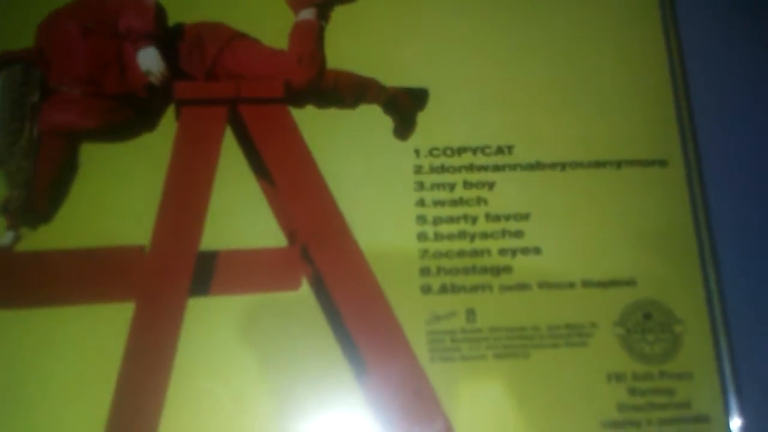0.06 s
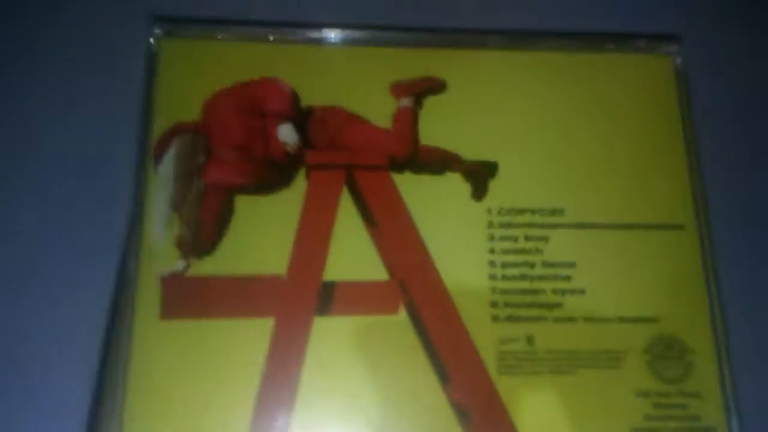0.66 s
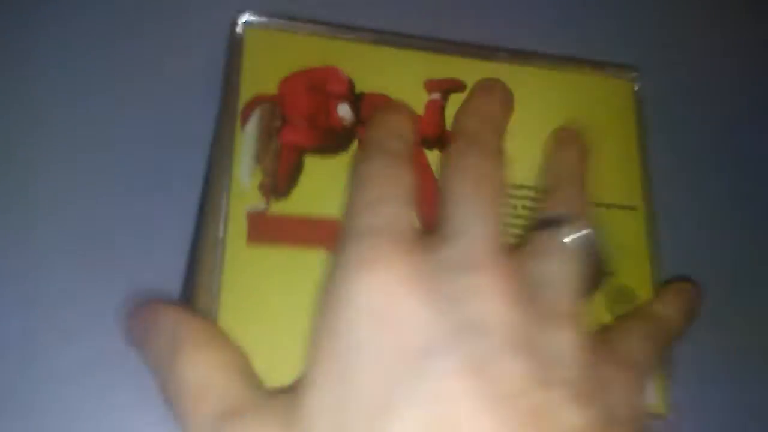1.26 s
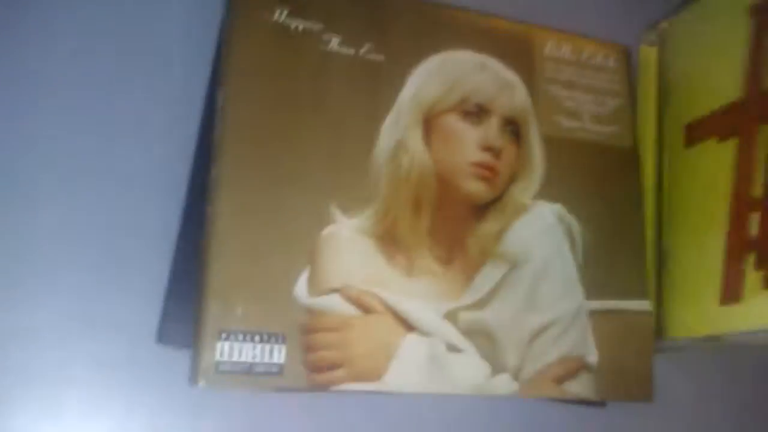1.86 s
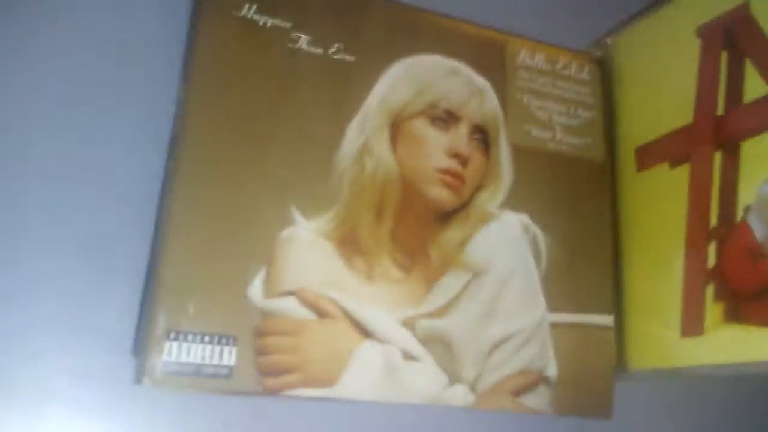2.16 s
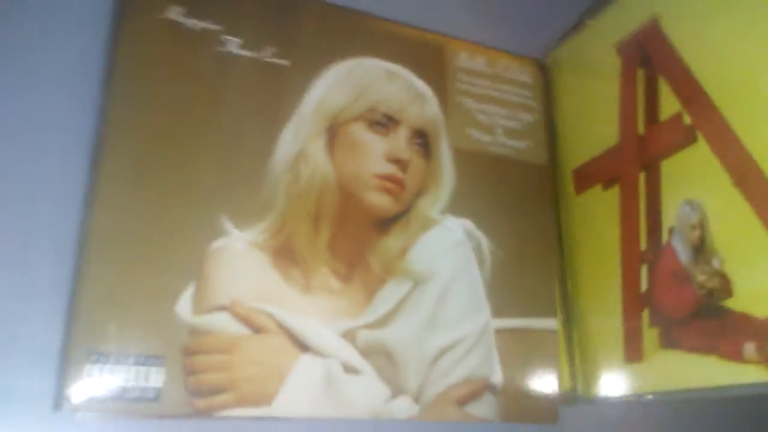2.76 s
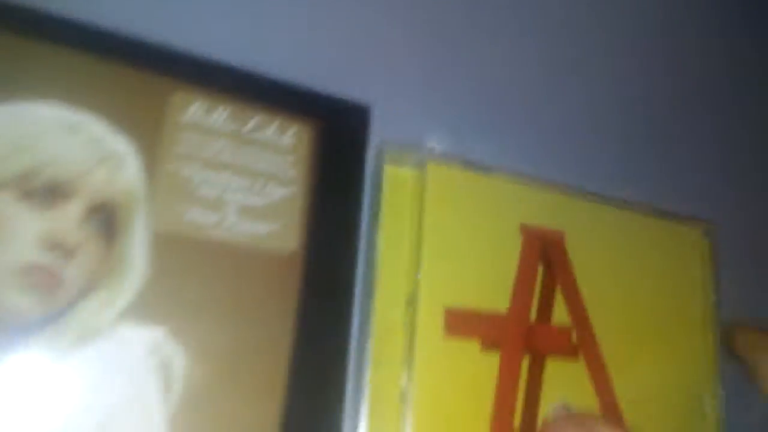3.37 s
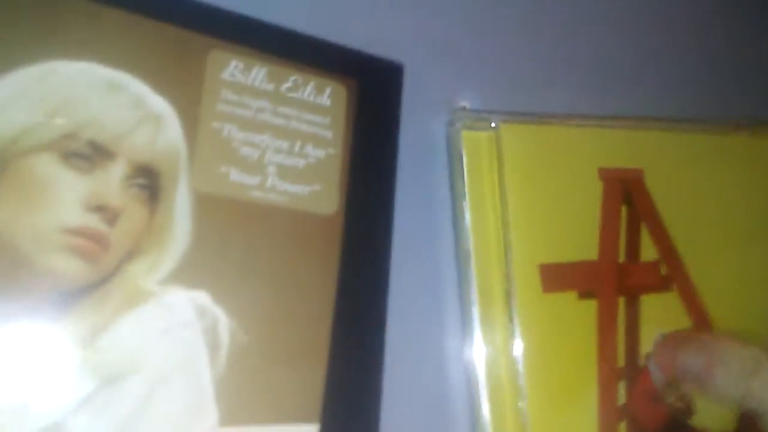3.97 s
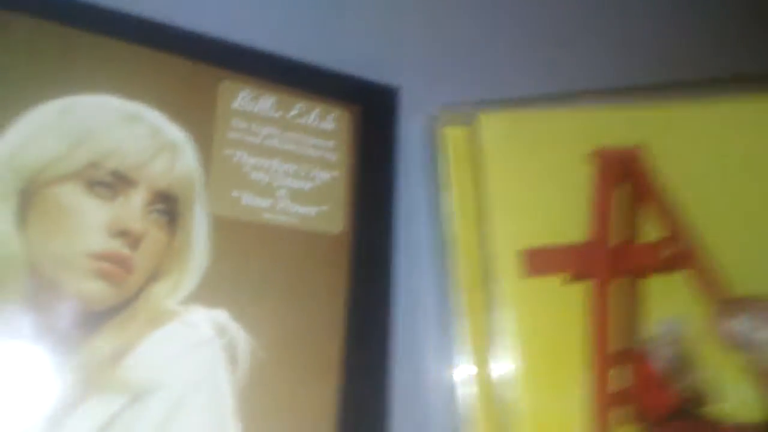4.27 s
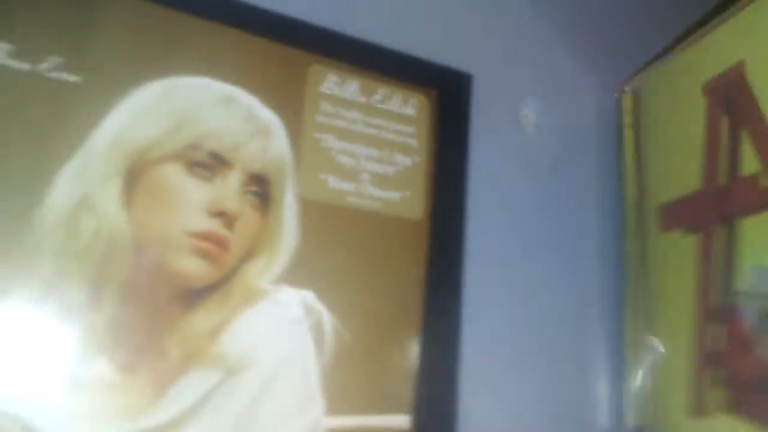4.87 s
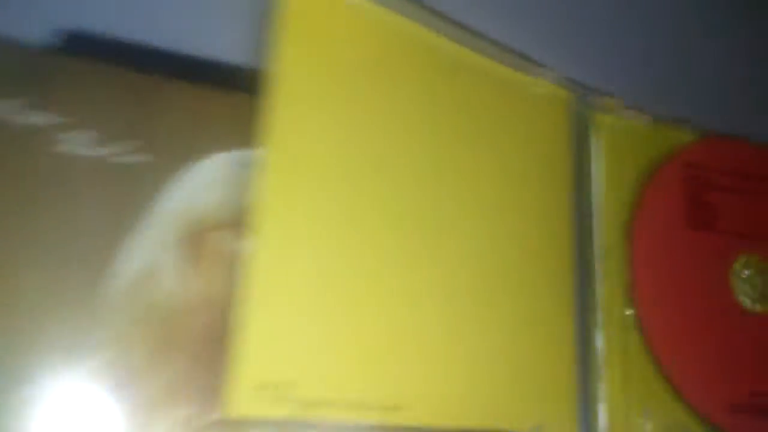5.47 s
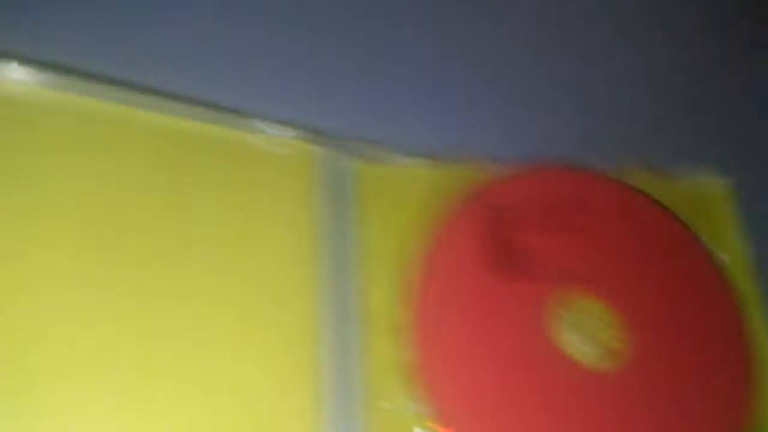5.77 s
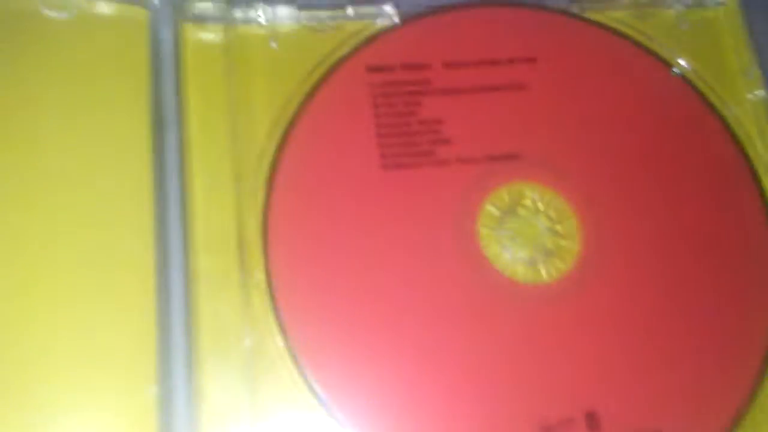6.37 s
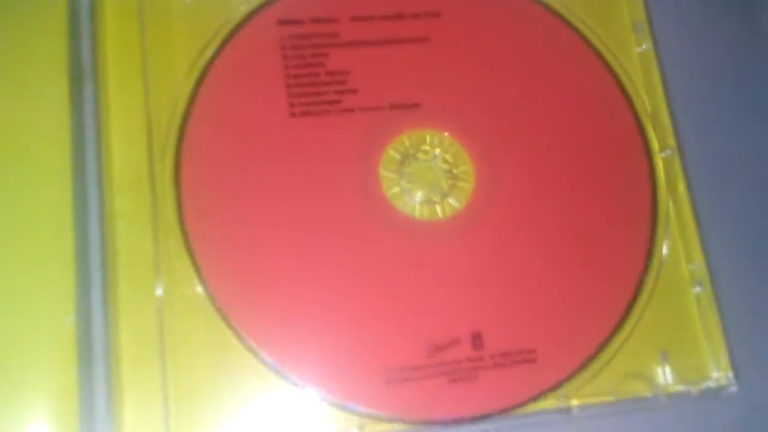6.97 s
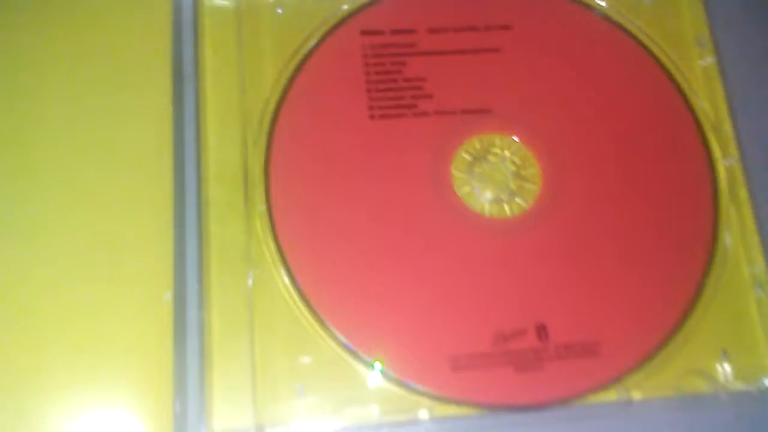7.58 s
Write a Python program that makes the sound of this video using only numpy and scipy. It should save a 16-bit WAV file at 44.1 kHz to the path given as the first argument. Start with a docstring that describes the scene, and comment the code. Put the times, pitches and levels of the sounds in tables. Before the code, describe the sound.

Hands rub softly on a plastic disc case and slide it over a card sleeve with a few light clicks. A loud, sharp clatter follows with a thump on the table, then a second burst, a faint squeak and a thinner clatter as the case opens. A few soft bumps fade into quiet rubbing. It is all close, in a small room with faint hiss and hum, on a slightly dull microphone.

```python
"""A table in a small room: a plastic disc case is slid over a card sleeve, shifted about and opened.
Its loose lid, tray and hinge click and clatter, each hit a low knock, a mid clack and a bright snap
with a short ring from the thin shell. The table thumps, the plastic squeaks and hands rub softly.
Under it lies steady room tone with a faint hum, all heard close on a small camera's dull microphone."""
import sys
import numpy as np
from scipy import signal
from scipy.fft import rfft, irfft, next_fast_len
from scipy.io import wavfile
from scipy.ndimage import uniform_filter1d, minimum_filter1d, map_coordinates

SR = 44100
rng = np.random.default_rng(int(sys.argv[2]) if len(sys.argv) > 2 else 0)


def put_to_file(sound):
    """Save the sound as 16-bit audio at rate SR, in the file named by the first command-line argument."""
    columns = np.atleast_2d(sound).T  # one column per channel
    safe = np.clip(columns, -1, 1)
    whole_steps = np.round(safe * 32767)
    wavfile.write(sys.argv[1], SR, whole_steps.astype(np.int16))


N = 341183

# lid, tray and case hit each other or the table; harder is snappier: t/s, level/dB, hardness/dB, t60/s
CLICK_CUES = [(0.362, -59, 15, .022), (.397, -51.5, 15.5, 0.0059), (1.713, -27, -3, 0.022),
              (1.733, -34, -5.5, 0.058), (1.9, -31, -16.5, 0.044), (1.910, -40.5, -27, 0.05),
              (2.134, -21.5, 1, .026), (2.96, -13.5, 1, 0.014), (3.019, -34, 4.5, .038),
              (3.154, -29, -2, 0.079), (3.163, -20.5, 5, .048), (3.222, -44.5, 9.5, 0.045),
              (3.275, -6.5, 0, 0.049), (3.281, -13.5, 7.5, .036), (3.302, -23.5, 9, 0.049),
              (3.377, -30.5, 4, 0.043), (3.385, -25.5, 5, 0.024), (3.401, -36, 2, 0.023),
              (3.413, -27, -23, 0.051), (3.42, -27, 6, 0.056), (3.449, -23.5, 1, 0.034),
              (4.058, -43.5, -17, 0.062), (4.107, -32, -7.5, 0.047), (4.173, -36.5, -11, 0.057),
              (4.19, -36.5, 4.5, 0.051), (4.3171, -12.5, 1, 0.04), (4.323, -16.5, 1.5, .032),
              (4.344, -26.5, 0.5, 0.03), (4.359, -28.5, 3, 0.051), (4.458, -41, 0.5, 0.068),
              (4.6385, -40.5, -5.5, 0.036), (4.658, -34, -12.5, 0.043), (4.918, -41.5, -1, .036),
              (4.9407, -28.5, 6, 0.063), (4.955, -30.5, -7, 0.048), (4.98, -34, -7, 0.059),
              (5.287, -23.5, 3.5, 0.02), (5.302, -31, 3.5, 0.032), (5.327, -36, 10.5, 0.037),
              (5.34, -30.5, 9, 0.054), (5.349, -26.5, 3, 0.043), (5.402, -28.5, 5.5, 0.083),
              (5.442, -29, 2, 0.047)]
# an edge or a finger scrapes along, then catches: t/s, level/dB, hardness/dB, swell/s
SCRAPE_CUES = [(1.325, -45, -6.5, 0.0048), (1.612, -44.5, -2, 0.022), (3.073, -26.5, 4, 0.0093),
               (3.341, -19, 5, 0.0042), (4.086, -30, -4.5, 0.012), (4.256, -24.5, -3.5, 0.0065),
               (4.286, -21, 2.5, .0034), (4.573, -51, -12, .008), (4.801, -45, 7.5, 0.0067),
               (5.367, -18.5, 5.5, 0.0044), (5.83, -44, -17, 0.009), (5.866, -48, -1.5, 0.0062),
               (5.924, -48, -11, .006)]
# EQ of a hit's three layers, body knock, panel clack and edge snap: f/Hz, level/dB
KNOCK_EQ = [(25, -55.5), (60, -20), (130, -13.5), (200, -5.5), (340, 0), (560, 0.5), (750, -11),
            (1200, -38)]
CLACK_EQ = [(350, -38.5), (700, -9.5), (1000, 0), (1500, 1), (2050, -1.5), (2400, -6.5), (2900, -3),
            (3900, -24)]
SNAP_EQ = [(1900, -30), (2900, -6.5), (3500, 1), (4500, -0.5), (5900, 3), (9000, -2), (11000, -2),
           (15000, -2)]
# ringing modes of the thin shell: f/Hz, level/dB, t60/s
SHELL_MODES = [(356.2, -10, .12), (978, -13.5, .17), (1498, -6.5, .1), (1585, -18.5, .13),
               (1920, -9.5, .07), (2546, -7, .15), (3176, -4.5, .14), (3509, -9, .1), (3718, -10, .07),
               (4211, -8, .15), (4716, -7, .12), (5046, -2.5, .058), (5502, -13.5, .1), (5956, -9.5, .15)]
# hand and case bump the table: t/s, f/Hz, level/dB, t60/s
THUMP_CUES = [(1.901, 100, -47, 0.15), (3.277, 42, -40, .2), (3.282, 96, -32, 0.22),
              (3.277, 249.5, -8.5, 0.069), (4.318, 205.5, -22.5, .1), (5.303, 96, -41, 0.16),
              (5.37, 215, -30, 0.089), (5.655, 197, -35.5, 0.12), (5.839, 224, -34, 0.15),
              (5.932, 205, -37.5, 0.13)]
# plastic sticks and slips: t/s, length/s, f/Hz, pitch jitter/Hz, level/dB
SQUEAK_CUES = [(0.3955, 0.0034, 3600, 250, -39), (2.906, .024, 3270, 90.2, -43.5),
               (4.626, 0.078, 2546, 130, -49), (4.694, 0.28, 2520, 121, -60.5)]
# the case slides over card and table: t/s, length/s, level/dB
SLIDE_CUES = [(1.435, 0.58, -50.5), (2.139, 0.18, -47.5), (2.959, 0.63, -44.5), (4.11, .3, -47),
              (4.679, .4, -49.5), (5.328, 0.29, -50.5)]
# pressure of the rubbing hands, as a fader ride: t/s, level/dB
HAND_PRESSURE = [(0.0, -50), (0.21, -47.5), (0.97, -49.5), (1.75, -47.5), (2.45, -54), (2.95, -50.5),
                 (3.3, -44), (3.49, -51), (3.81, -53.5), (4.07, -52.5), (4.26, -47.5), (4.68, -50),
                 (5.24, -53), (5.51, -49.5), (6.1, -56.5), (7.41, -56), (7.74, -54.5)]
# EQ of the rub's soft body and of its friction hiss: f/Hz, level/dB
RUB_BODY_EQ = [(80, -25), (230, -2), (480, 1.5), (680, -2), (900, -0.5), (1150, -5.5), (1500, -9.5),
               (1950, -11.5), (2600, -13.5), (3500, -23.5)]
RUB_HISS_EQ = [(700, -12), (1900, 5), (3000, -1), (3600, 0.5), (4500, 0), (5600, 3.5), (9000, -9.5)]
# reverb time of the room: f/Hz, t60/s
ROOM_DECAY = [(100, .6), (400, 0.54), (1500, 0.29), (4000, 0.32), (8000, 0.21)]
# EQ of room air and microphone hiss: f/Hz, level/dB
AIR_EQ = [(25, -42.5), (65, -24), (110, -23.5), (190, -9), (340, 4), (450, 0), (750, -1), (1200, -9),
          (2000, -11.5), (4000, -17), (5600, -14.5), (9000, -22)]
# partials of the hum: f/Hz, level/dB
HUM_PARTIALS = [(75.4, -82.5), (145.3, -68.5), (242.2, -68), (360.7, -70), (516.8, -65.5)]
# response of the narrow-band microphone: f/Hz, level/dB
MIC_EQ = [(5900, 1), (6450, -4), (7000, -11), (7650, -30.5), (9300, -28), (10200, -47), (15500, -68)]

CLICK_RISE_S, SCRAPE_T60_S = .0014, .046
HEAVY_T60_S = 0.052  # a hit this long moves the whole case; a quicker one only the lid
LID_OPEN_S = 5.2  # from here on the open case clacks thinner and higher


def case(lead_s=.0008):
    """Clicks, scrapes and ticks of the plastic case, each with its own room reverb."""
    hits = [(s, rebounding(s, db, hard, CLICK_RISE_S, t60)) for s, db, hard, t60 in CLICK_CUES]
    hits += [(s, rebounding(s, db, hard, swell, SCRAPE_T60_S)) for s, db, hard, swell in SCRAPE_CUES]
    out = np.zeros(N)
    for s, sound in hits + list(ticks()):
        add(out, s - lead_s, sound)
        add(out, s - lead_s, room(sound))
    return out


def contact(s, db, hardness_db, rise, t60, graze_s=.0008, shift_octaves=.33, open_octaves=0.23):
    """One hit: a low knock of the whole case, a clack of its panels and a snap of its edges."""
    t = np.arange(SR // 4) / SR
    # the parts graze just before they meet, rattle for a few milliseconds, then settle quickly
    attack = rise + graze_s
    fade_db = 20 * (3 * np.maximum(t - attack, 0) / t60) ** 1.116
    envelope = np.minimum(t / attack, 1) ** 2 * amp(-fade_db)
    knock_db = -2 - 24.5 * lightness(t60) - 0.18 * hardness_db  # heavy, soft hits knock most
    blow = amp(knock_db) * clatter(envelope, KNOCK_EQ, chatter_db=0.1)
    stiffness = np.tanh((hardness_db + 1.5) / 7)  # harder hits shake stiffer, higher parts of the panels
    pitch = 2 ** (shift_octaves * stiffness + open_octaves * (s > LID_OPEN_S))
    clack_eq = [(hz * pitch, level) for hz, level in CLACK_EQ]
    blow += amp(-0.5) * clatter(envelope, clack_eq, chatter_db=3.7)
    blow += amp(hardness_db + 3) * clatter(envelope, SNAP_EQ, chatter_db=1.0)
    return amp(db) * (blow + shell(blow, t))


def rebounding(s, db, hardness_db, rise, t60, bounce_loss_db=13.5, light_loss_db=16):
    """A hit and two ever weaker bounces as the loose parts fall back; light hits hardly bounce."""
    sound = contact(s, db, hardness_db, rise, t60)
    flights_s = 0.38 * t60 * np.exp(.25 * rng.standard_normal(2))
    db = db - light_loss_db * lightness(t60)
    for k, delay in enumerate(np.cumsum(flights_s), 1):
        bounce = contact(s, db - k * bounce_loss_db, hardness_db, CLICK_RISE_S, t60=0.045)
        add(sound, rise + delay, bounce)
    return sound


def lightness(t60):
    """0 for a hit that moves the whole case, nearing 1 for the quickest flick of the lid."""
    return max(1 - t60 / HEAVY_T60_S, 0)


def clatter(envelope, eq, chatter_db):
    """Loose parts chatter and shake panel modes so dense that they blur into a noise burst."""
    slips = unit(uniform_filter1d(rng.standard_normal(len(envelope)), size=30))
    burst = coloured(envelope * amp(chatter_db * slips) * rng.standard_normal(len(envelope)), eq)
    return burst * np.linalg.norm(envelope) / np.linalg.norm(burst)


def shell(blow, t, ring_db=-52.5, scatter_db=2.0):
    """The thin shell rings on after a blow, its modes balanced anew for each spot that is struck."""
    hz, db, t60 = np.transpose(SHELL_MODES)[:, :, None]
    struck_db = db + scatter_db * rng.standard_normal(hz.shape)
    modes = amp(struck_db - 60 * t / t60) * np.cos(2 * np.pi * hz * t)
    return amp(ring_db) * signal.fftconvolve(blow, modes.sum(axis=0))[:len(t)]


def ticks(per_slide=3, trim_db=-2.5, spread_db=0.5):
    """The sliding case catches lightly at random moments; yields (time, sound) pairs."""
    for start, length, db in SLIDE_CUES:
        for when, softness in zip(rng.random(per_slide), rng.standard_normal(per_slide)):
            tick_db = db + trim_db - spread_db * softness
            yield start + when * length, contact(start, tick_db, 0, CLICK_RISE_S, t60=0.026)


def thumps(attack_s=0.0052, mode_spread=.15):
    """Soft, heavy bumps rock the table top in three close, quickly damped low modes."""
    out, t = np.zeros(N), np.arange(SR // 3) / SR
    for s, hz, db, t60 in THUMP_CUES:
        detune = np.exp(mode_spread * (np.arange(-1, 2) + .3 * rng.standard_normal(3)))
        ring = np.sin(2 * np.pi * hz * detune[:, None] * t).mean(axis=0)
        add(out, s, ring * amp(db - 60 * t / t60) * (1 - np.exp(-t / attack_s)))
    return out + room(out)


def squeaks(flutter_db=5.5):
    """Stick-slip keeps one narrow resonance of the plastic singing for a moment."""
    out = np.zeros(N)
    for s, length, hz, jitter_hz, db in SQUEAK_CUES:
        size = int(length * SR)
        pitch = hz + jitter_hz * wobble(460)[:size]
        tone = np.sin(2 * np.pi * np.cumsum(pitch) / SR) * amp(flutter_db * wobble(400)[:size])
        add(out, s, amp(db) * unit(tone) * signal.windows.tukey(size, .5))
    return out + room(out)


def rubbing(rise_s=0.016, fall_s=.18, grain_db=2.7, uneven_db=1.9):
    """Skin, card and plastic slide with uneven pressure: a soft body under a grainy hiss."""
    t = np.arange(N) / SR
    hands_db = np.interp(t, *np.transpose(HAND_PRESSURE))
    effort_db = hands_db - hands_db.mean()
    sliding = np.zeros(N)
    for s, length, db in SLIDE_CUES:
        fade_in = np.interp(t - s, [0, rise_s], [0, 1])
        fade_out = np.interp(t - s - length, [-fall_s / 2, fall_s / 2], [1, 0])
        sliding += amp(db) * fade_in * fade_out
    body = amp(hands_db.mean() + 1.21 * effort_db - 3) * noise(RUB_BODY_EQ, patchy_db=2)
    skin = amp(-65.5 + 1.7 * effort_db)  # pressing harder lifts the hiss faster than the body
    hiss = np.hypot(sliding, skin) * amp(grain_db * wobble(260) - 5) * noise(RUB_HISS_EQ, patchy_db=3)
    return amp(uneven_db * wobble(14)) * (body + hiss)


def room(x, wet_db=-17, early_t60=0.058, predelay_s=.006):
    """Early reflections off table and walls, then a diffuse tail; new on each call, as the case moves."""
    hz, t, spectra = signal.stft(rng.standard_normal(SR * 3 // 4), SR, nperseg=256)
    decay = amp(-60 * t / along(ROOM_DECAY, hz)[:, None])
    tail = signal.istft(spectra * decay, SR, nperseg=256)[1]
    t = np.arange(len(tail)) / SR
    early = rng.standard_normal(len(t)) ** 3 * amp(-60 * t / early_t60)  # cubed for sparse spikes
    impulse = amp(wet_db) * (tail / np.linalg.norm(tail) + early / np.linalg.norm(early))
    return signal.fftconvolve(x, np.pad(impulse, (round(predelay_s * SR), 0)))[:N]


def table_reflection(x, height_m=0.16, sway_db=1.6, sway_per_s=1.5, reflection=0.12):
    """A reflection off the table puts a faint, slowly drifting hollow colour on rubbing and room tone."""
    height = height_m * amp(sway_db * wobble(sway_per_s))  # the hand-held camera sways
    delay = 2 * height / 343 * SR
    return x + reflection * map_coordinates(x, [np.arange(N) - delay])


def room_tone(air_db=-55, hum_trim_db=-1, drift_rad=0.56):
    """A steady bed of room air with a faint, slightly wavering hum."""
    t = np.arange(N) / SR
    hum = np.zeros(N)
    for hz, db in HUM_PARTIALS:
        phase = 2 * np.pi * hz * t + drift_rad * wobble(2.7)
        hum += amp(db + hum_trim_db) * np.sqrt(2) * np.sin(phase)
    return amp(air_db + .5 * wobble(1.5)) * noise(AIR_EQ, patchy_db=1.5) + hum


def noise(eq, patchy_db):
    """Noise of rms 1 whose colour drifts around the EQ curve in broad patches."""
    spectra = signal.stft(rng.standard_normal(N), nperseg=1024)[2]
    patches = uniform_filter1d(rng.standard_normal(spectra.shape), size=5, axis=0)
    patches = uniform_filter1d(patches, size=18, axis=1)
    patchy = signal.istft(spectra * amp(patchy_db * unit(patches)), nperseg=1024)[1][:N]
    return unit(coloured(patchy, eq))


def coloured(x, eq, rolloff_db_per_octave=24):
    """Minimum-phase EQ through (f/Hz, level/dB) points, with a roll-off above the last."""
    size = next_fast_len(len(x) + 4096, True)
    hz = np.fft.rfftfreq(size, 1 / SR)
    db = along(eq, hz) - rolloff_db_per_octave * np.log2(np.maximum(hz / eq[-1][0], 1))
    cepstrum = irfft(np.log(amp(db)), size)
    cepstrum[1:size // 2] *= 2  # folded forward, so nothing rings ahead of a transient
    cepstrum[size // 2 + 1:] = 0
    return irfft(rfft(x, size) * np.exp(rfft(cepstrum)), size)[:len(x)]


def along(points, hz):
    """Read (f/Hz, value) points on a log frequency axis."""
    f, values = np.transpose(points)
    return np.interp(np.log(hz + 1), np.log(f), values)


def wobble(rate):
    """A smooth random modulator, rate knots a second."""
    return map_coordinates(rng.standard_normal(int(N * rate / SR) + 4), [np.arange(N) * rate / SR])


def amp(db):
    """Decibels to gain."""
    return 10 ** (np.asarray(db) / 20)


def unit(x):
    """Scale to rms 1."""
    return x / np.sqrt(np.mean(x ** 2) + 1e-20)


def add(track, s, x):
    """Mix x into the track from time s."""
    i = max(round(s * SR), 0)
    track[i:i + len(x)] += x[:len(track) - i]


def scene():
    """The mono mix: hits, thumps and squeaks over the rubbing and the room tone."""
    return (case() + thumps() + squeaks() + table_reflection(rubbing() + room_tone()))[None]


def record(dry, self_noise_db=-89, limit=0.91, clip_at=.89, top_hz=15800):
    """The microphone dulls the top end; the hardest clack is limited and its tips clip with a crack."""
    x = coloured(dry[0], MIC_EQ, rolloff_db_per_octave=0) + amp(self_noise_db) * rng.standard_normal(N)
    held_gain = minimum_filter1d(np.minimum(1, limit / (np.abs(x) + 1e-9)), size=65)
    smooth_gain = uniform_filter1d(uniform_filter1d(held_gain, size=31), size=31)
    x = np.clip(x * smooth_gain, -clip_at, clip_at)
    return irfft(rfft(x) * (np.fft.rfftfreq(N, 1 / SR) < top_hz), N)[None]


dry = scene()
out = record(dry)
put_to_file(out)
```